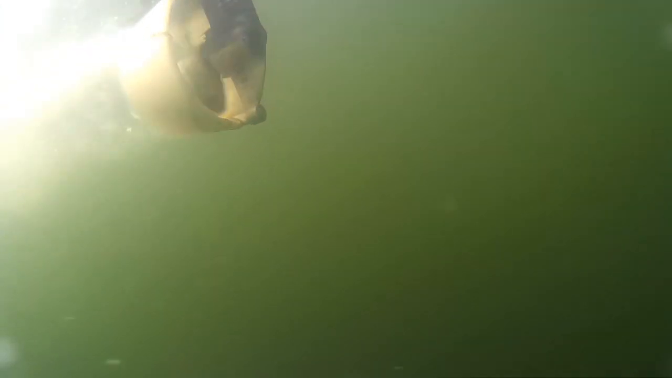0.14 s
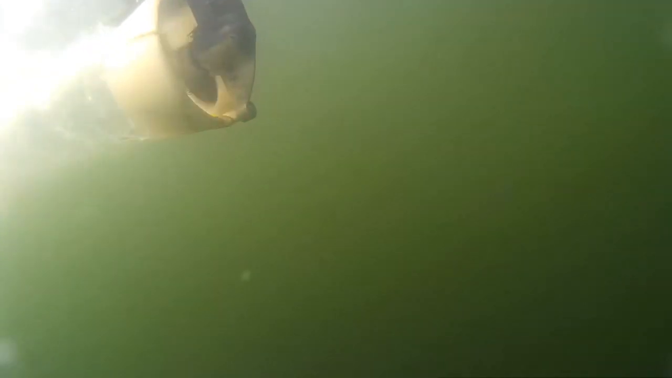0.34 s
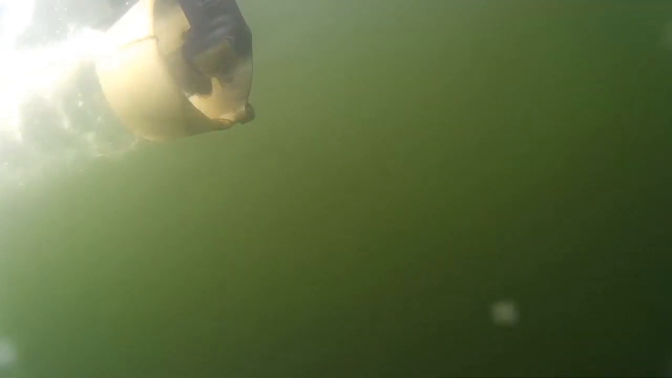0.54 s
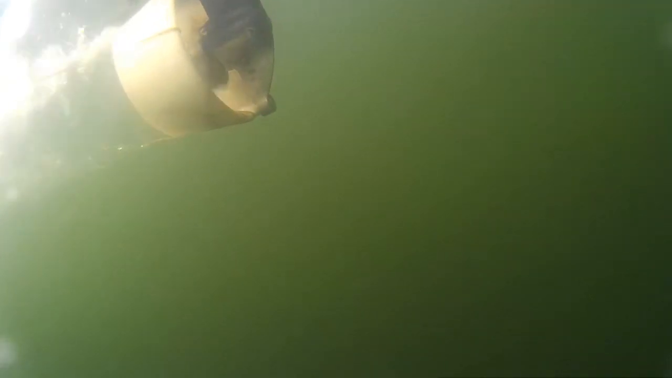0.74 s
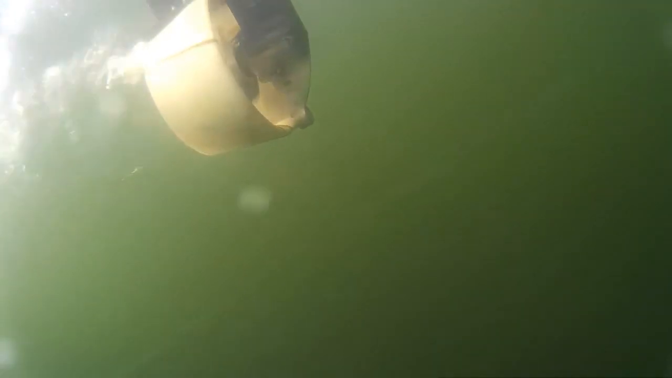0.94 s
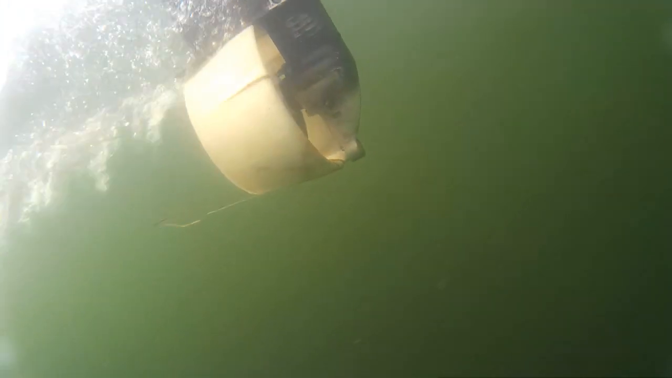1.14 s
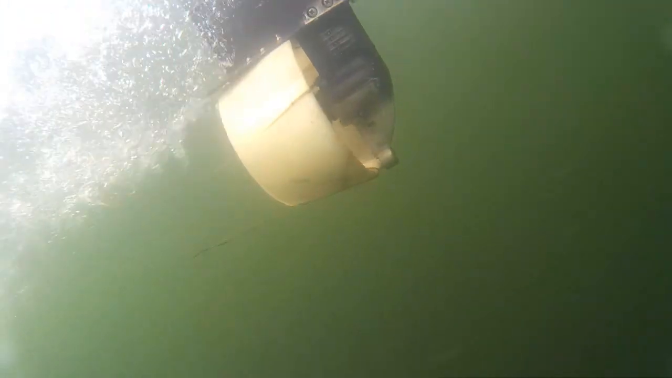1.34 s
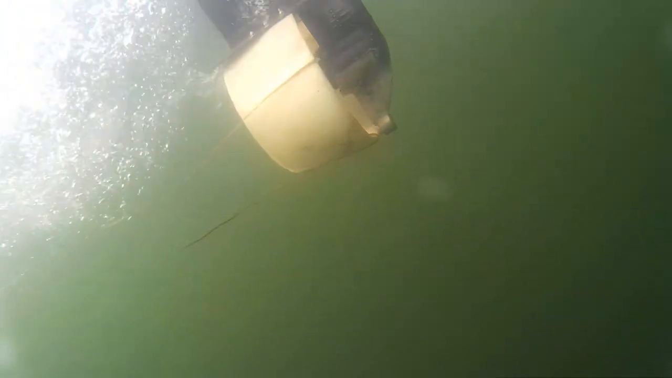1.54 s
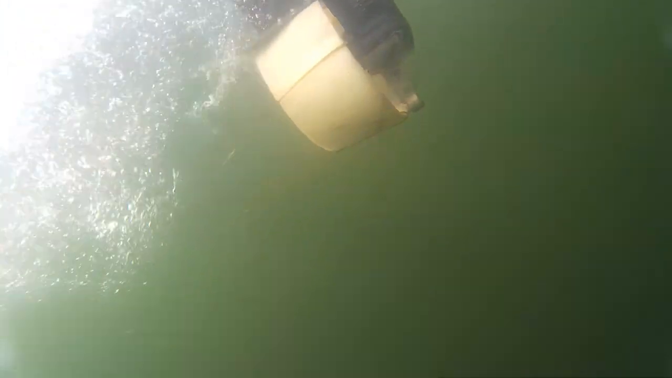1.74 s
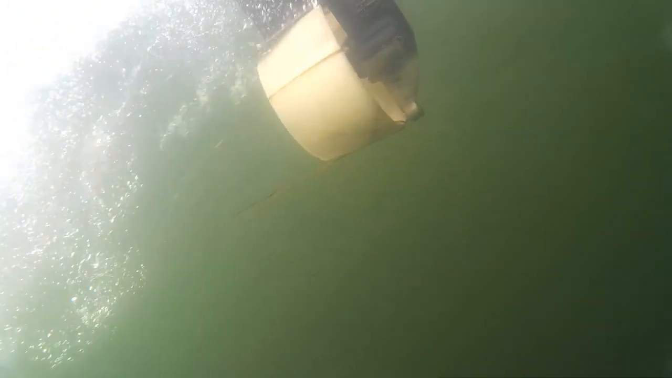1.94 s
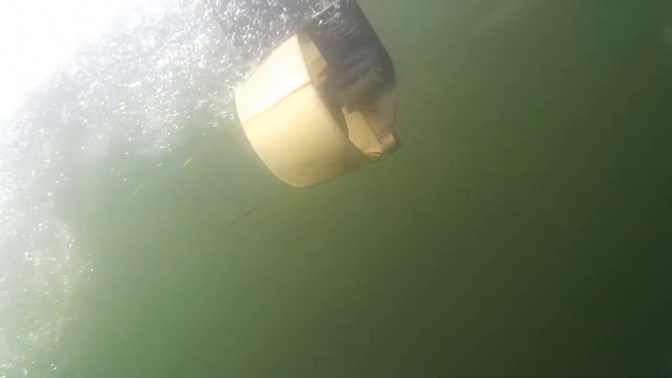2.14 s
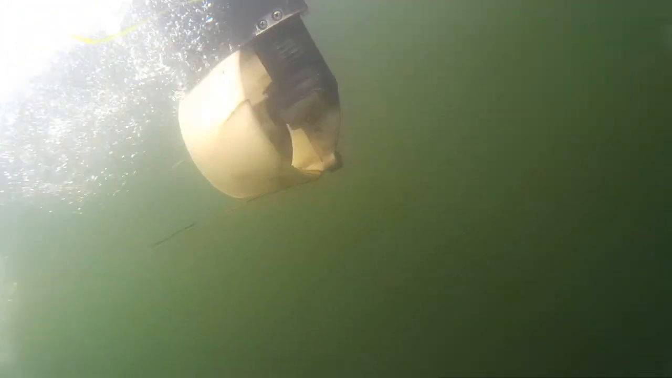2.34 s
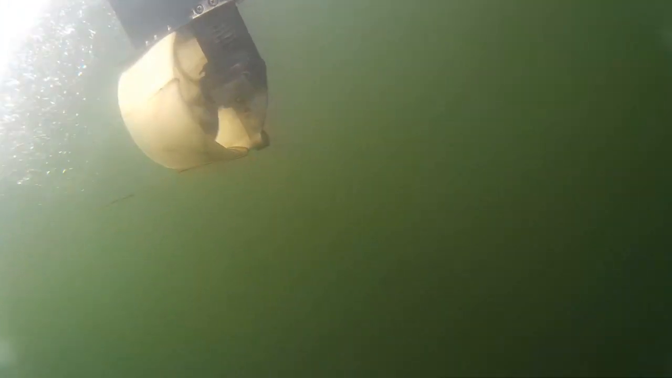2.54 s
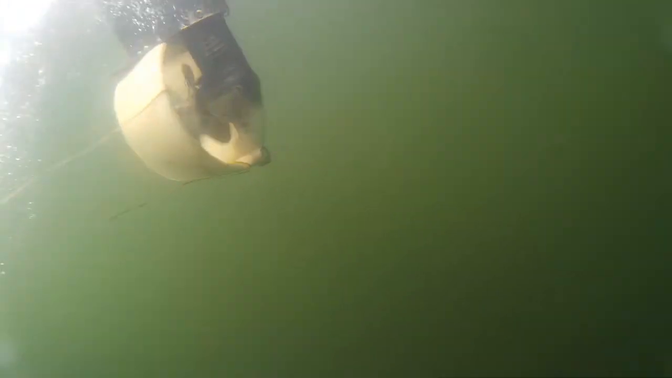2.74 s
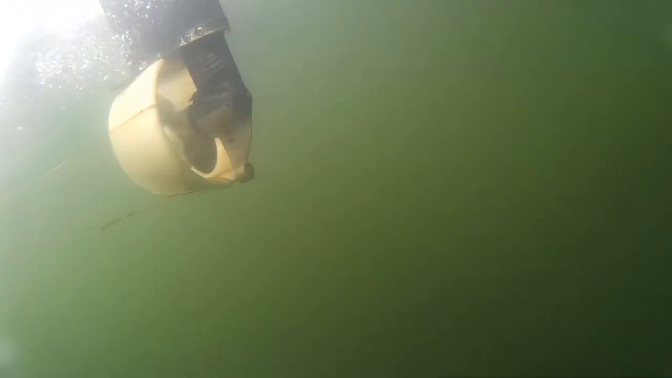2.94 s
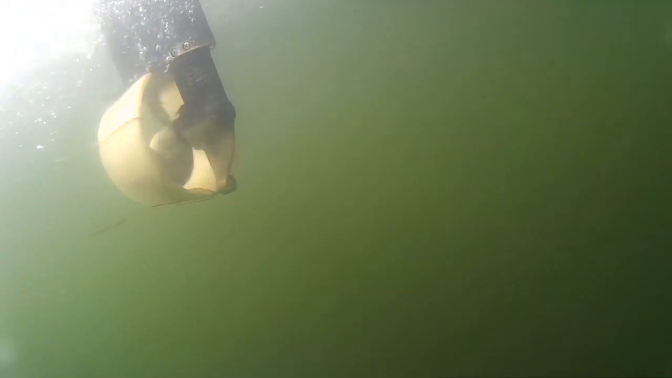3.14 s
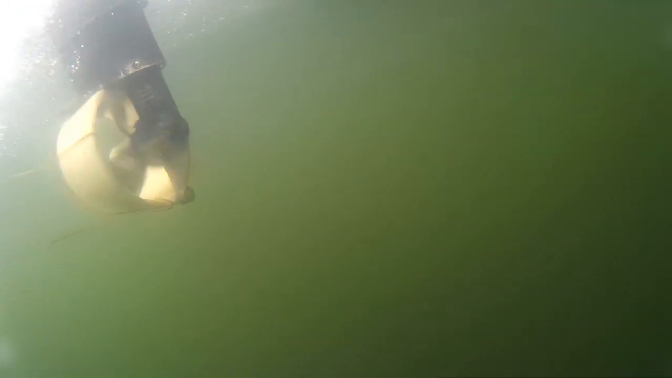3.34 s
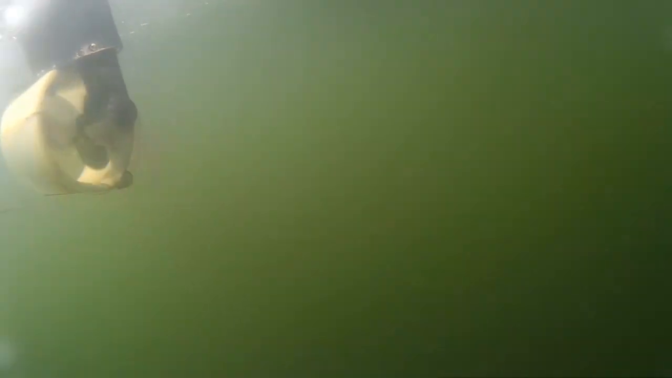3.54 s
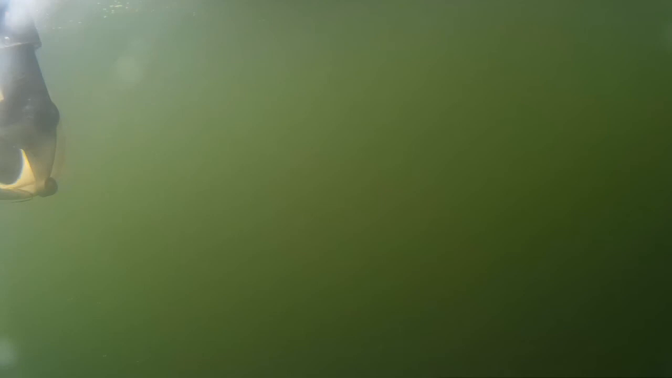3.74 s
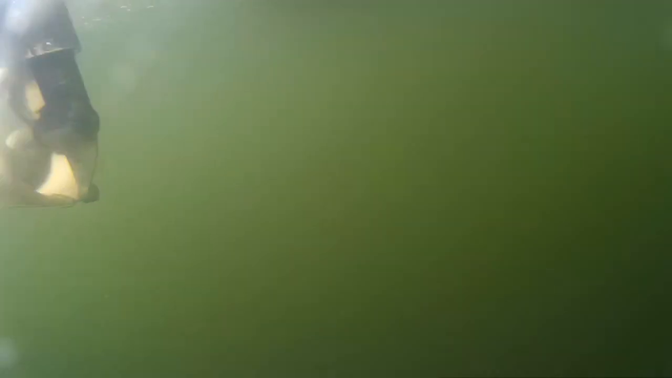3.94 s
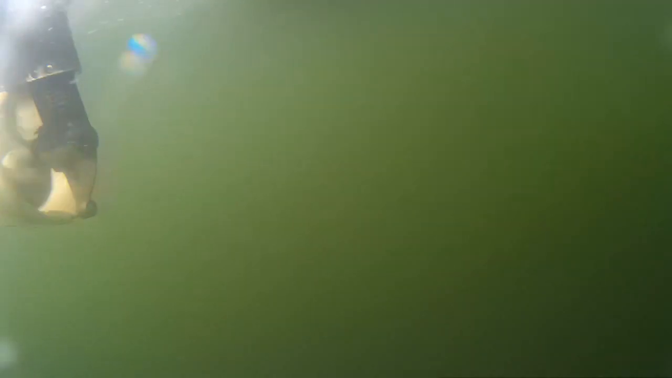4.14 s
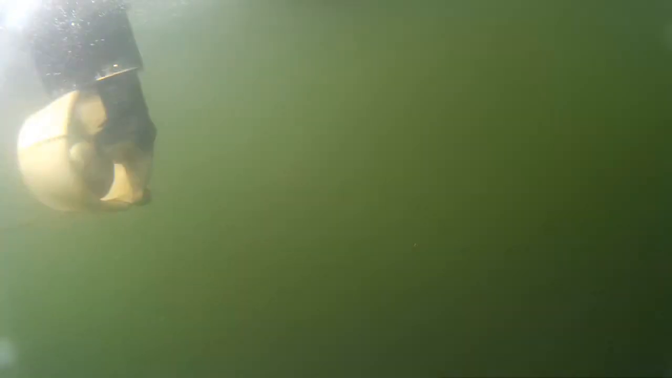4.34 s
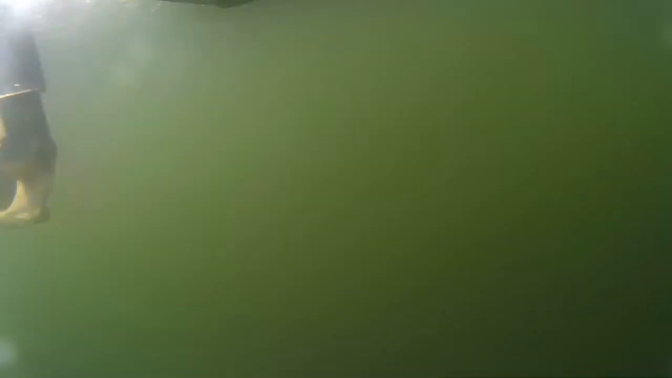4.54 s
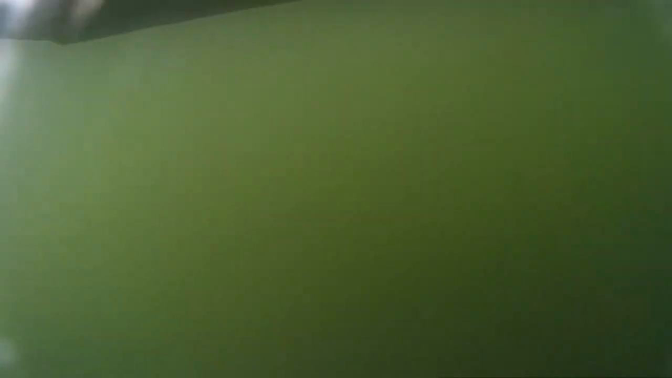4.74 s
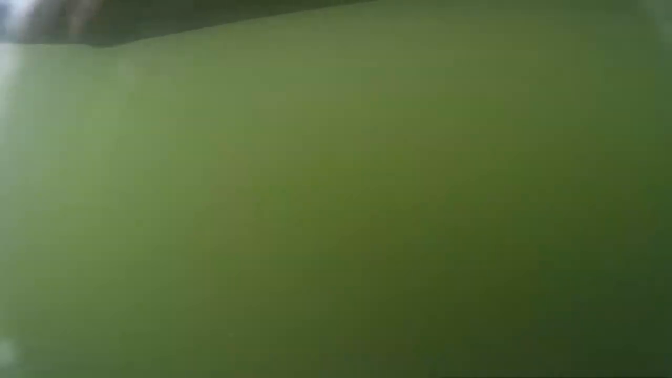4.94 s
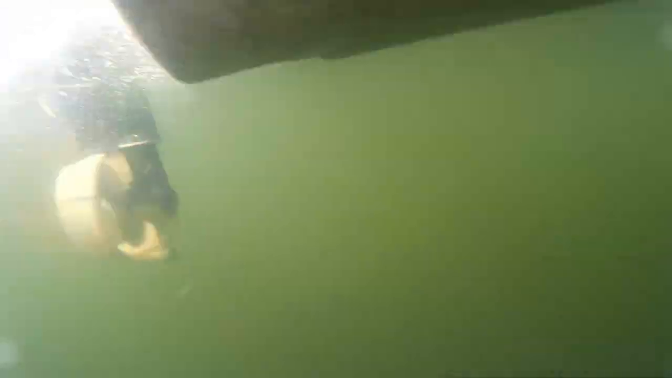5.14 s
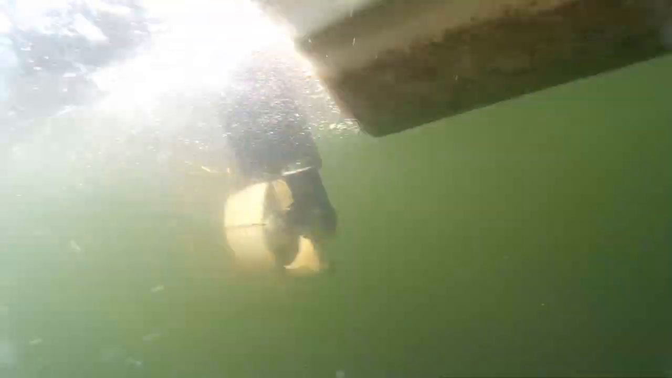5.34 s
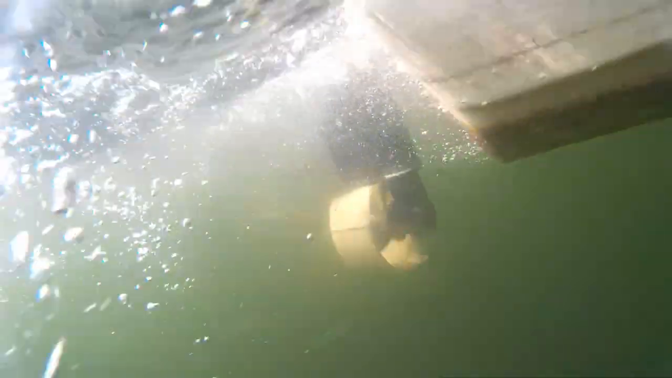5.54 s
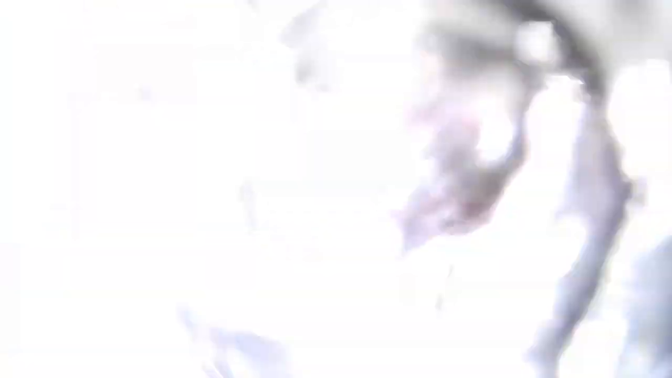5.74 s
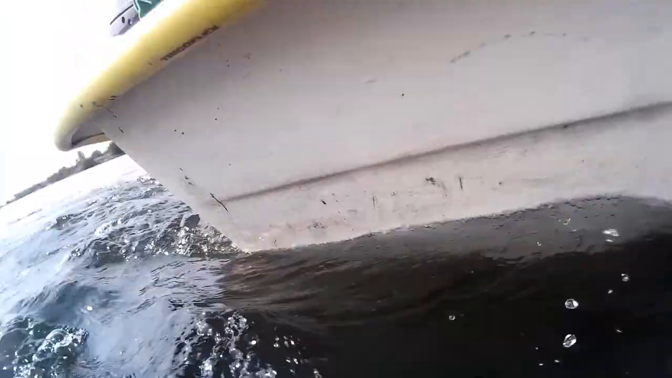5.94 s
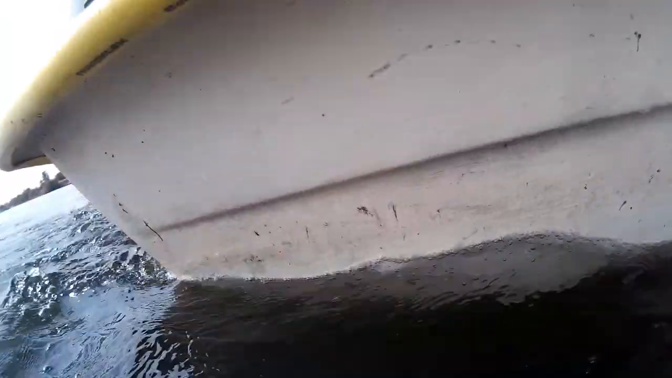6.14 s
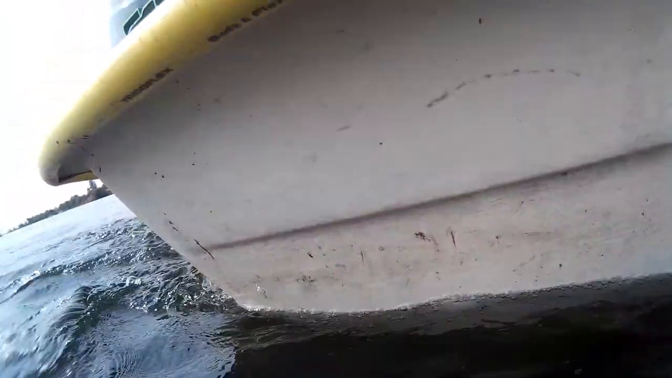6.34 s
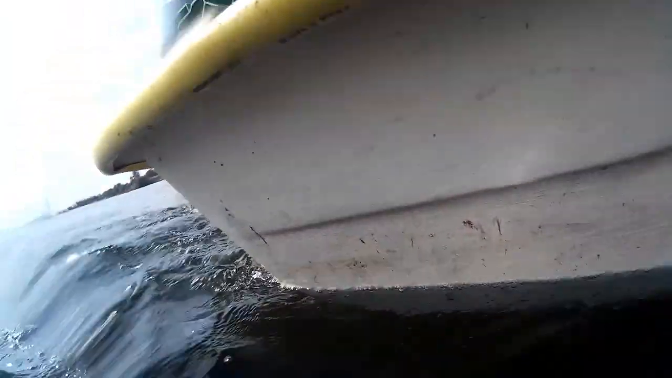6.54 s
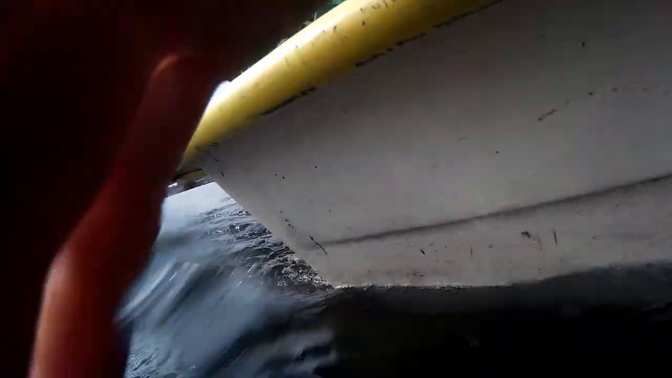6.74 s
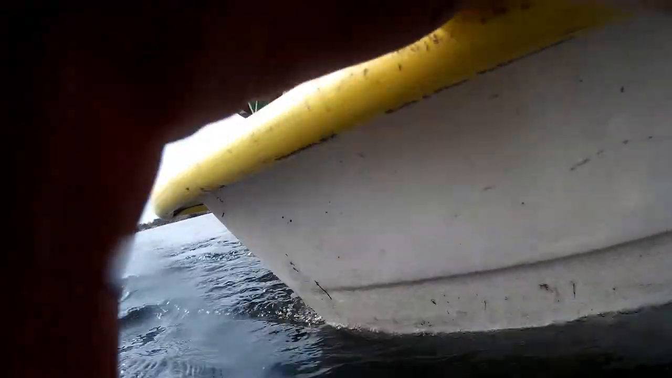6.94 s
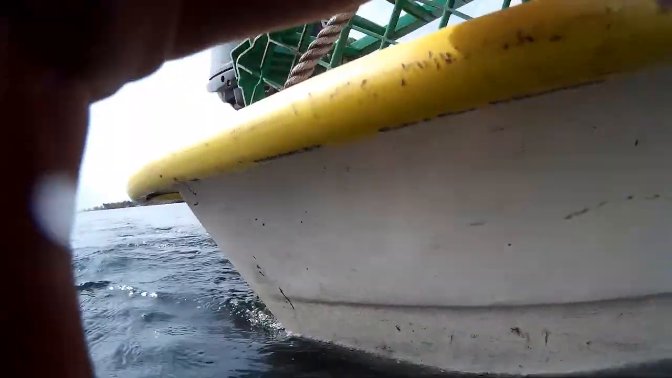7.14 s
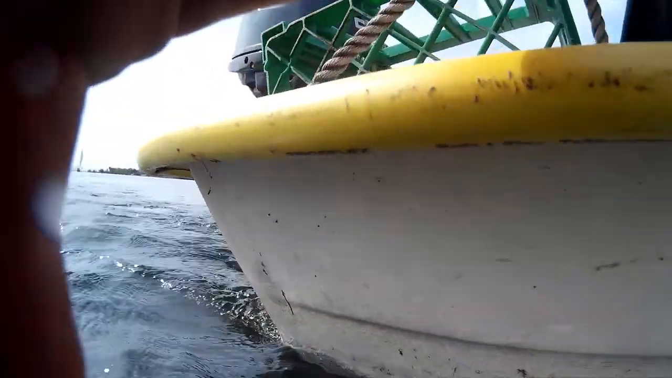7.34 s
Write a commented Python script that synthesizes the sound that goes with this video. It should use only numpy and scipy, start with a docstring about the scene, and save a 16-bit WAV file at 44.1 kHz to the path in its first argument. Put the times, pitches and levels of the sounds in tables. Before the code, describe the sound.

A microphone in a sealed housing sits underwater near a small outboard. From 0 to 0.7 seconds the motor runs fast, a dense drone with gear whine and gurgling exhaust. It slows from 0.7 to 2, unloaded gears singing as pitch falls, into a quick metallic ticking idle, about twelve cycles a second, over a hollow 600 hertz hum. Low bubble thumps with clicks strike at 1.7, 2.7 and 4.2, briefly ducking everything; glugs, plops and foam fizz scatter between. Idle quickens slightly after 4.4. From 5.6 to 6.05 the housing surfaces: bright rising plops, chirping drips, washing water and a click. The motor drops to a faint airborne whirr with hiss, water washing until 6.2. Quiet follows, with a small tap at 6.7, spray swish and wet finger squeak at 6.85, a very loud hard knock at 6.98, a soft press at 7.1, a sharp crack at 7.18 and light washing to the end.

```python
"""Outboard heard under water

A small four-stroke outboard is throttled back to idle: ticking valves, whining gears and a humming leg.
These are cycle-locked pulses and sines, filtered noise and resonances; exhaust is swarms of decaying sines.
Big bubbles thump the camera housing with low rings and overload clicks, and the level ducks under them.
The housing then surfaces through splashing water: chirps, shaped noise and knocks of noise plus shell modes."""
import sys
import numpy as np
from scipy import signal
from scipy.fft import rfft, irfft, next_fast_len
from scipy.io import wavfile
from scipy.ndimage import uniform_filter1d, map_coordinates

SR = 44100
rng = np.random.default_rng(int(sys.argv[2]) if len(sys.argv) > 2 else 0)


def generate_wav(sig):
    """Save sig (samples, or channels by samples) to the path in sys.argv[1] as 16-bit PCM at SR."""
    pcm = np.round(np.clip(np.atleast_2d(sig).T, -1, 1) * 32767).astype(np.int16)
    wavfile.write(sys.argv[1], SR, pcm)


N = 325458
T = np.arange(N) / SR


def motor(submerged, surge, foam_clouds):
    """Metal, lines, tooth noise and exhaust share one engine cycle; all fade as the housing surfaces."""
    cycle = engine_cycle()
    throttle = opening()
    turn = 2 * np.pi * (cycle + CRANK_JITTER_CYCLES * wobble(90))
    machinery = metal(cycle, throttle) + lines(turn, throttle) + mesh(turn, throttle)
    return submerged * (machinery + exhaust(cycle, throttle, submerged, surge, foam_clouds))


# engine speed: t/s, cycle rate/Hz
ENGINE_SPEED = [(0, 28.3), (.5, 28), (.72, 26.6), (.85, 23.9), (1, 22), (1.3, 17), (1.55, 14.8), (2, 12.3),
                (2.6, 11.6), (3.95, 11.63), (4.1, 12), (4.4, 12.3), (4.8, 13.2), (5.1, 13.1), (5.4, 14)]


def engine_speed():
    """Four-stroke cycles per second; each cycle is two crank turns."""
    return curves(ENGINE_SPEED)[0]


VALVE_S = 3.108  # cycle count is zero here, as a valve shuts
CRANK_JITTER_CYCLES = .001  # uneven rotation


def engine_cycle():
    """Integrated speed gives the running cycle count."""
    cycle = np.cumsum(engine_speed()) / SR
    return cycle - np.interp(VALVE_S, T, cycle)


def opening():
    """Throttle from speed: 0 at the slowest, 1 at the fastest."""
    speed = engine_speed()
    return (speed - speed.min()) / np.ptp(speed)


def stroke(cycle, offset, length):
    """A sharp rise and exponential fall once a cycle."""
    return np.exp(-((cycle - offset) % 1) / length)


# machinery reference level: t/s, level/dB
MACHINE_LEVEL = [(0, -48.5), (.9, -46.5), (1.7, -50), (1.85, -51.5), (2.4, -59.5), (2.65, -49.5),
                 (4.15, -50.5), (4.3, -59.5), (4.9, -50.5), (5.5, -53.5), (5.7, -63.5)]
# casing spectrum: f/Hz, density/dB per Hz
CASING_SPECTRUM = [(500, -23.5), (1000, -2), (1250, -5.5), (1430, 6.5), (1800, 10.5), (2200, -8),
                   (2600, -10), (3080, 7.5), (3400, -1.5), (3800, -15), (5000, -34.5), (10000, -48.5),
                   (15000, -54)]
# valve tick spectrum: f/Hz, density/dB per Hz
TICK_SPECTRUM = [(400, -4), (1500, 20.5), (3200, 3), (4000, -3.5), (5600, -21.5), (6500, -14.5),
                 (8000, -30), (15000, -33)]
# motor leg resonances: f/Hz, width/Hz, level/dB
LEG_MODES = [(1425, 34, 13.5), (3130, 840, -33.5), (5500, 160, -9), (6150, 160, -31.5), (7850, 290, -15),
             (9220, 100, -16.5)]
LEG_WANDER = .02  # share by which passing bubbles detune the leg


def metal(cycle, throttle):
    """Valve impacts and rubbing drive casing and leg; ticks are distinct at idle, blurred at speed."""
    machine_db, = curves(MACHINE_LEVEL)
    valves = stroke(cycle, -.025, .09) + .55 * stroke(cycle, .475, .08)
    valves = valves * (1 - .8 * throttle) * amp(2 * wobble(20))
    steady = .55 + .45 * throttle
    rub = noise() * (steady + 2.2 * valves) * amp(2 * wobble(60))
    casing = coloured(rub, CASING_SPECTRUM)
    tapping = noise() * (steady + 4.5 * valves)
    ringing = waver(resonate(tapping, LEG_MODES), LEG_WANDER, rate=20)
    leg = coloured(ringing, [(900, -19.0), (1400, 8.5), (3200, -0.5), (4000, -13.0), (5400, -5.0),
                             (9600, -8.5), (12000, -22.5)])
    ticks = amp(-2.5) * coloured(noise() * valves, TICK_SPECTRUM)
    body = amp(9.5 - 5.8 * throttle) * casing + amp(8.0 + 0.67 * throttle) * leg
    return amp(machine_db) * (body + ticks)


# gear lines: multiple of cycle rate, level/dB
GEAR_LINES = [(26, -3), (48, -10), (52, 0), (58, -10), (63, -7), (76, -3), (80, -9), (90, -11), (100, -10),
              (104, -7), (126, -2), (148, -8)]
# gear case response to the whine: f/Hz, gain/dB
GEARCASE_RESPONSE = [(550, 0), (730, 1), (1100, -10), (1300, -5), (1450, 0), (1800, -2), (2200, -12),
                     (2600, -13), (2950, -8), (3200, -3), (3350, -4), (3560, -35)]
# firing lines: multiple of cycle rate, level/dB
FIRING_LINES = [(1, -13), (2, -6.5), (3, -10.5), (4, -10.5), (5, -3.5), (6, -6), (9, -14.5), (12, -15),
                (14, -13.5), (17, -10.5), (20, -7.5), (21, -8), (22, -8.5), (26, -7)]
WHINE_DB, DRONE_DB = -38.5, -23  # gains at full throttle
WHINE_FLUTTER_DB, WHINE_BLUR_RAD = 4.2, .45  # scale of each line's random level and phase


def lines(turn, throttle):
    """Gear and firing harmonics are sines locked to the cycle; they stand out under throttle."""
    whine, drone = np.zeros(N), np.zeros(N)
    for k, db in GEAR_LINES:
        level = amp(db + WHINE_FLUTTER_DB * wobble(45))
        whine += level * np.sin(k * turn + WHINE_BLUR_RAD * wobble(140))
    whine = shaped(whine, GEARCASE_RESPONSE)
    for k, db in FIRING_LINES:
        drone += amp(db + 2 * wobble(8)) * np.sin(k * turn + rng.uniform(0, 2 * np.pi))
    return amp(WHINE_DB) * throttle ** 0.5 * whine + amp(DRONE_DB) * throttle ** 3 * drone


MESH_DB, MESH_CLOSING_DB = -51.5, 8  # at full throttle; added as the throttle closes
CLOSING_HZ_PER_S = 17  # slowing that gives the whole addition


def mesh(turn, throttle):
    """Tooth noise is a comb under throttle; unloaded teeth sing out as the engine slows."""
    closing = np.clip(-np.gradient(engine_speed()) * SR / CLOSING_HZ_PER_S, 0, 1)
    closing = uniform_filter1d(closing, size=SR // 10)
    level = amp(MESH_DB + MESH_CLOSING_DB * closing + 1.5 * wobble(26))
    return level * throttle ** 3.1 * coloured(teeth(turn / (2 * np.pi), size=256), CASING_SPECTRUM)


def teeth(cycle, size):
    """Uneven teeth: one rough pattern repeats every crank turn, twice a cycle."""
    return np.interp(2 * cycle % 1, np.arange(size) / size, rng.standard_normal(size), period=1)


# exhaust wake reaching the housing: t/s, level/dB
WAKE_LEVEL = [(0.0, -33), (0.81, -36), (1.13, -32), (1.51, -34.5), (2.2, -32), (2.46, -32.5), (3.54, -33),
              (3.73, -36.5), (3.91, -51.5), (4.14, -37.5), (4.3, -29.5), (4.68, -31), (4.86, -42.5),
              (5.27, -29.5), (5.46, -48), (5.7, -43.5)]
# leg hum resonances: f/Hz, width/Hz, level/dB
HUM_MODES = [(600, 63.4, 20.5), (663, 240, -27.5)]
# foam spectrum: f/Hz, density/dB per Hz
FOAM_SPECTRUM = [(500, -3), (1000, -2), (1500, -2), (2100, 0), (2500, -7), (3300, -2), (4500, -11.5),
                 (9000, -12)]
GURGLE_DB, BURBLE_DB = 3.5, 2  # re wake level
HUM_DB, HUM_FOLLOWS = -25, 0.33  # level at mean wake; dB per dB of wake
HUM_WANDER = .03  # share by which passing bubbles detune the hum
FOAM_DB, FOAM_THROTTLE_DB = -38.5, -11.5  # at idle; change at full throttle
FOAM_SWELL_DB, FOAM_SWELL_KNOTS_PER_S = 2, 13
SURGE_GURGLE_DB, SHIELD_DB = -26.5, -23  # surge to gurgle; surge to screening of hum and foam


def exhaust(cycle, throttle, submerged, surge, foam_clouds):
    """Puffs ring the leg and tear into bubble swarms; air pockets screen hum and foam."""
    wake_db, = curves(WAKE_LEVEL)
    puffs = (1 + 1.2 * stroke(cycle, 0.15, 0.15)) * amp(2.6 * wobble(45))
    ringing = waver(resonate(noise() * puffs, HUM_MODES), HUM_WANDER, rate=20)
    hum = coloured(ringing, [(200, -8.0), (480, 3.5), (760, 4), (950, -7.5), (2000, -35.0)])
    burble = coloured(swarm(70, 520, .6, 34, 2.2, size=3400), [(800, 0), (1100, -7)])
    gurgle = swarm(170, 260.4, 1.0, 3.2, 2.5, size=3400)
    foam_swell = amp(FOAM_SWELL_DB * wobble(FOAM_SWELL_KNOTS_PER_S))
    foam = coloured(swarm(1100, 1500, .65, 16, 1.6, size=520) * foam_swell, FOAM_SPECTRUM)
    hum_gain = amp(HUM_DB + HUM_FOLLOWS * (wake_db - wake_db.mean())) * submerged ** 2
    gurgle_gain = np.hypot(amp(wake_db + GURGLE_DB), amp(SURGE_GURGLE_DB) * surge) * submerged ** 4
    burble_gain = amp(wake_db + BURBLE_DB) * submerged ** 4
    foam_gain = np.hypot(amp(FOAM_DB + FOAM_THROTTLE_DB * throttle), foam_clouds)
    screened = 1 / (1 + amp(SHIELD_DB) * surge)
    return screened * (hum_gain * hum + foam_gain * foam) + gurgle_gain * gurgle + burble_gain * burble


# foam and fizz clouds: t/s, foam level/dB, fizz level/dB
BUBBLE_CLOUDS = [(1.23, -32.5, -74), (1.65, -44, -67), (2.25, -27, -70), (2.654, -22, -54.5),
                 (3.17, -28.5, -81), (3.581, -35.5, -79), (4.14, -52, -64), (5.68, -23.5, -63)]
CLOUD_RISE_S, CLOUD_FALL_S = 0.019, 0.0052


def drifting():
    """Foam and fizz gains swell as clouds of fine bubbles drift past."""
    return sum(amp([[foam_db], [fizz_db]]) * swell(s, CLOUD_RISE_S, CLOUD_FALL_S)
               for s, foam_db, fizz_db in BUBBLE_CLOUDS)


# large air pockets at the housing: t/s, peak/dB, f/Hz, t60/s
AIR_POCKETS = [(1.714, 1.5, 169, 0.065), (1.743, 18, 91.1, 0.24), (2.309, -1.5, 144.6, 0.037),
               (2.708, -1, 147, 0.082), (2.749, 8, 85, 0.038), (3.471, -5.5, 132.6, 0.1),
               (3.589, -7, 93.4, 0.065), (3.641, -12, 148, 0.079), (3.655, 0.5, 131, 0.091),
               (4.178, 8, 121, 0.046), (4.202, 17, 128.4, 0.039), (4.211, 3.5, 48.6, 0.23),
               (4.25, -0.5, 127, 0.032), (4.743, -10.5, 141.5, 0.11), (5.543, -20.5, 111, 0.11),
               (5.606, -20, 190, 0.12), (5.826, -19, 165, 0.098)]
SURGE_RISE_S, SURGE_FALL_S = 0.013, 0.086


def stirring():
    """Water surge round the air pockets: a gain summed in power."""
    return np.sqrt(sum((amp(db) * swell(s, SURGE_RISE_S, SURGE_FALL_S)) ** 2
                       for s, db, hz, t60 in AIR_POCKETS))


# exhaust bubbles: t/s, peak/dB, f/Hz, t60/s
EXHAUST_BUBBLES = [(.074, -13.5, 590, 0.039), (.832, -11, 587, 0.032), (.975, -11.5, 569, 0.048),
                   (.9995, -3, 590, 0.02), (1.085, -9.5, 566, 0.052), (1.236, -12, 596, 0.083),
                   (1.247, -9.5, 450, 0.063), (1.259, -20.5, 585, .06), (1.304, -7, 513, 0.079),
                   (1.319, -11, 568, 0.061), (1.339, -9.5, 580, 0.051), (1.375, -16.5, 457, 0.18),
                   (1.834, -1.5, 620, 0.075), (1.853, 3.5, 478, 0.077), (1.857, -4, 722, 0.08),
                   (1.99, -5.5, 514, 0.039), (2.034, 0, 558, 0.033), (2.038, -8.5, 362, 0.13),
                   (2.117, -7, 406, 0.053), (2.288, 2, 577, 0.04), (2.421, -8, 565, 0.12),
                   (2.478, -11, 593, 0.06), (2.674, -6.5, 540, 0.031), (2.936, -12, 643, 0.054),
                   (2.971, -12, 605, .05), (3.125, -5.5, 592, 0.018), (3.254, -7, 637, 0.02),
                   (3.285, -11, 605, 0.054), (3.311, -7, 583, 0.028), (3.508, -11, 585, 0.081),
                   (3.72, -12, 611, 0.059), (4.153, -8, 623.5, 0.45), (4.405, -4, 315.5, 0.12),
                   (4.542, -9.5, 683, 0.053), (4.594, -2.5, 555, 0.044), (4.8, -12, 745, 0.073),
                   (4.872, -10.5, 665, 0.016), (5.083, -13.5, 606, 0.088), (5.119, -2, 606, 0.045),
                   (5.167, -10, 515, 0.043), (5.195, -10, 560, 0.044), (5.239, -8.5, 596, 0.049),
                   (5.285, -12.5, 610, 0.062), (5.345, -19.5, 646, 0.12), (5.359, -6, 638, 0.06),
                   (5.48, -15, 616, 0.099)]
# bright plops, under water and at the surface: t/s, peak/dB, f/Hz, t60/s, pitch rise/share
PLOPS = [(.832, -27, 810, 0.033, 0.016), (1.423, -25, 1480, 0.04, .1), (2.035, -20.5, 716, 0.038, 0.015),
         (2.125, -21, 1447, 0.053, 0.22), (2.632, -12, 1414, 0.024, 0.38),
         (3.253, -20.5, 1390, 0.05, 0.025), (4.398, -10, 1374, 0.053, 0.035),
         (4.587, -15.5, 1423, 0.034, 0.089), (5.113, -23.5, 2080, 0.021, 0.035),
         (5.166, -11, 835, 0.049, 0.046), (5.243, -13, 1433, 0.013, 0.047), (5.54, -17, 2650, 0.029, 0.05),
         (5.628, -10.5, 1448, 0.061, 0.12), (5.636, -23, 2680, 0.02, 0.15),
         (5.657, -16, 3100, 0.0316, 0.095), (5.666, -12, 1830, 0.041, 0.034),
         (5.722, -23, 1740, 0.058, 0.22), (5.773, -14, 1710, 0.039, 0.22), (5.78, -10, 1750, 0.056, 0.11),
         (5.783, -32.5, 3230, 0.035, 0.088), (5.804, -12.5, 945, 0.037, .2),
         (5.824, -7.5, 712, 0.074, 0.315), (5.864, -21, 1720, 0.034, 0.14),
         (5.894, -27, 2120, 0.0466, 0.26), (5.964, -8.5, 2020, 0.024, 0.34), (6.039, 1, 1358, 0.06, 0.049)]
# small bubbles and drops: t/s, peak/dB, f/Hz
DROPS = [(1.177, -32, 3850), (1.208, -33.5, 3950), (1.87, -31.5, 3970), (2.567, -30.5, 4230),
         (2.603, -42, 4200), (2.612, -29, 3200), (2.622, -35, 4200), (2.634, -33, 4500), (2.663, -33, 3900),
         (2.671, -36, 3900), (2.69, -37.5, 4000), (3.102, -34, 4100), (3.546, -37, 4100),
         (4.333, -41, 4200), (4.62, -39.5, 4130), (5.115, -32.5, 4200), (5.494, -31, 3940),
         (5.542, -34, 5100), (5.66, -42, 5540), (5.663, -38, 8200), (5.691, -33, 3720), (5.711, -49, 7500),
         (5.761, -52, 8000), (5.8, -37, 5770), (5.855, -48, 7400), (5.862, -26, 3600), (5.914, -35, 3800),
         (5.926, -21.5, 4220), (5.946, -54, 4600), (5.961, -35, 4300), (5.986, -34, 3700)]
PING_T60_S = 0.013


def loud_bubbles():
    """Air volumes ring as decaying sines, from pockets to droplets; some pinch off with a rush."""
    thumps = bubbles(AIR_POCKETS, rise=0.1, onset=0.13, ragged=0.5, ragged_hz=289.7)
    glugs = bubbles(EXHAUST_BUBBLES, rise=0.043, onset=0.95, ragged=0.48, ragged_hz=360)
    glugs += amp(-13.0) * pinches(EXHAUST_BUBBLES, decay_s=0.01)
    plops = amp(-16.5) * pinches([row[:4] for row in PLOPS], decay_s=0.011)
    for *row, rise in PLOPS:
        plops += bubbles([row], rise, onset=0.49, ragged=0.7, ragged_hz=600)
    drops = [(s, db, hz, PING_T60_S) for s, db, hz in DROPS]
    pings = bubbles(drops, rise=0.016, onset=1.3, ragged=0.15, ragged_hz=1200)
    return thumps + glugs + plops + pings + trapped_ring()


# air trapped at the housing: start/s, end/s, f/Hz, level/dB
TRAPPED_AIR = (5.632, 5.646, 590, -7.5)
POCKET_RISE_S, POCKET_FALL_S = 0.0035, 0.018


def trapped_ring():
    """Air trapped against the housing rings about one pitch, with wavering level and phase."""
    start, end, hz, db = TRAPPED_AIR
    level = amp(db + 2.0 * wobble(80)) * swell(start, POCKET_RISE_S, POCKET_FALL_S, end - start)
    return level * np.sin(2 * np.pi * hz * T + 0.42 * wobble(54))


def bubble(t, hz, t60, rise, onset):
    """A bubble swells in, rings down and rises in pitch."""
    age = t / t60
    ring = np.sin(2 * np.pi * hz * t * (1 + rise * np.minimum(age, 1)))
    return ring * np.exp(-float(np.log(1000)) * age) * (1 - np.exp(-np.minimum(t * hz / onset, 20)))


def bubbles(rows, rise, onset, ragged, ragged_hz):
    """Single bubbles; a torn bubble's ringing roughens as its wall flutters."""
    out, t = np.zeros(N), np.arange(SR // 4) / SR
    for s, db, hz, t60 in rows:
        flutter = map_coordinates(rng.standard_normal(1024), [t * ragged_hz], mode="wrap")
        ring = bubble(t, hz, t60, rise, onset) * (1 + ragged * flutter)
        add(out, s, amp(db) * ring / np.abs(ring).max())
    return out


def pinches(rows, decay_s):
    """The short rush of water as each bubble pinches off: pitch-scaled noise."""
    out, t = np.zeros(N), np.arange(SR // 20) / SR
    for s, db, hz, t60 in rows:
        spectrum = [(hz / 5, -14), (0.44 * hz, 0), (1.0 * hz, 0), (2.07 * hz, -20), (6 * hz, -47),
                    (12 * hz, -68)]
        rush = coloured(rng.standard_normal(len(t)), spectrum)
        add(out, s, amp(db) * rush * np.exp(-t / decay_s) * (1 - np.exp(-t * hz * 2)))
    return out


def swarm(rate, centre_hz, spread, cycles, scatter_db, size, rise=0.049):
    """A random bubble cloud at rms 1: rate per second, t60 in cycles, size in samples."""
    count = int(rate * N / SR)
    u = rng.random((count, 4), dtype=np.float32)
    t = np.arange(size, dtype=np.float32) / SR
    hz = np.minimum(centre_hz * np.exp(spread * (u[:, 1:2] + u[:, 2:3] - 1)), SR / 3)
    level = amp(-scatter_db * np.log(0.0017 + u[:, 3:]))
    grains = level * bubble(t, hz, cycles / hz, rise, onset=0.48)
    at = (u[:, :1] * N).astype(int) + np.arange(size)
    return unit(np.bincount(at.ravel(), grains.ravel(), N)[:N])


# overload clicks at the bubble thumps, then blows to the housing: t/s, level/dB, ring re click/dB
CLICKS_AND_KNOCKS = [(1.178, -20.5, -29), (1.209, -17, -23), (1.719, -27, -20.5), (1.743, -15, -21),
                     (2.708, -23.5, -30), (3.644, -26, -23), (4.183, -12.5, -44), (4.204, -9.5, -17),
                     (5.121, -18.5, -10), (6.037, -10.5, -6), (6.044, -15.5, -4.5), (6.245, -33, -22),
                     (6.726, -34.5, -6), (6.977, 7.5, -10.5), (6.98, 4, -0.5), (6.984, -0.5, 9),
                     (7.061, -15.5, -36), (7.175, 0.5, -41), (7.315, -22.5, -21)]
# crack spectrum: f/Hz, density/dB per Hz
CRACK_SPECTRUM = [(200, -5.5), (800, -4.5), (1400, 3), (2700, -1.5), (5200, -21.5), (8000, -28.5),
                  (12500, -35.5), (15500, -45.5)]
# shell modes: f/Hz, level/dB, t60/s
SHELL_MODES = [(183, -2.5, 0.097), (270, -1.5, 0.0081), (467, 1, 0.011), (850, -1, 0.025), (1310, 0, 0.03),
               (2700, -13.5, 0.01)]
# soft finger press: t/s, level/dB
FINGER_PRESS = (7.1015, -1)


def clicks_and_knocks():
    """Clicks and knocks: a short noise crack plus decaying shell modes; a finger gives one low push."""
    out, t = np.zeros(N), np.arange(SR // 6) / SR
    ring = sum(amp(level - 60 * t / t60) * np.sin(2 * np.pi * hz * t) for hz, level, t60 in SHELL_MODES)
    for s, db, ring_db in CLICKS_AND_KNOCKS:
        crack = coloured(rng.standard_normal(len(t)), CRACK_SPECTRUM) * np.exp(-t / 0.0033)
        add(out, s, amp(db) * (0.5 * crack + amp(ring_db) * ring))
    s, db = FINGER_PRESS
    u = t / 0.00096
    add(out, s, amp(db) * (u / 2) ** 2 * np.exp(2 - u) * (1 - u / 14))
    return out


# water washing over the housing, just before and after it surfaces: start/s, end/s, level/dB
WASHES = [(5.627, 5.674, -34.5), (5.774, 5.943, -35.5), (6.032, 6.181, -30), (6.737, 6.763, -45),
          (6.783, 6.952, -35), (7.013, 7.341, -37.5)]
# wash spectrum: f/Hz, density/dB per Hz
WASH_SPECTRUM = [(150, 9.5), (400, 0.5), (900, -3.5), (1400, 6.5), (2100, 1.5), (2900, -14.5), (4200, -14),
                 (5200, -33.5), (9000, -34.5), (15000, -48.5)]
# motor through the air: f/Hz, density/dB per Hz
AIRBORNE_SPECTRUM = [(100, -5), (300, -3.5), (550, -9.5), (700, -6), (900, -10.5), (1200, -4.5),
                     (1350, 6.5), (1600, -21), (1930, -2), (2200, -25), (3800, -23), (4700, -40),
                     (9000, -37)]
WASH_RISE_S, WASH_FALL_S = 0.0086, 0.019
FIZZ_DB = -67  # tiny bubbles


def surface(submerged, fizz_clouds):
    """Fine swarms fizz; at the surface a noise whirr is the motor, noise washes and chirps drain."""
    washing = sum(amp(db) * swell(start, WASH_RISE_S, WASH_FALL_S, end - start)
                  for start, end, db in WASHES)
    near_surface = np.interp(T, [5.55, 5.7], [0, 1])
    whirr = amp(-57.5) * coloured(noise(), AIRBORNE_SPECTRUM)
    wash = coloured(noise() * amp(2.14 * wobble(150)), WASH_SPECTRUM)
    draining = np.interp(T, [5.58, 5.66, 5.98, 6.06, 6.2, 6.25], [0, 1, 1, .5, .5, 0])
    trickle = amp(0.5) * draining * swarm(450, 1800, .8, 30, 2.3, size=1000, rise=.16)
    fine = swarm(800, 4300, .35, 30, 3.9, size=400)
    finest = swarm(900, 7200, .45, 32, 4, size=250)
    fizz_gain = amp(FIZZ_DB) * submerged + fizz_clouds + amp(-68) * draining
    fizz = fizz_gain * (fine + amp(-9.0) * finest)
    return near_surface * (whirr + washing * (wash + trickle)) + fizz + spray_swish() + finger_rub()


# spray swish: t/s, decay/s, level/dB
SPRAY_SWISH = (6.85, 0.031, -27.5)
# spray spectrum: f/Hz, density/dB per Hz
SPRAY_SPECTRUM = [(300, 5.5), (1000, 0.5), (2300, 8.5), (3000, -10), (4400, -2), (5500, -29), (8500, -22),
                  (12000, -52), (15500, -31)]


def spray_swish():
    """Spray is fast-flickering noise under a two-sided exponential."""
    s, decay_s, db = SPRAY_SWISH
    spray = coloured(noise() * amp(6.9 * wobble(560)), SPRAY_SPECTRUM)
    return amp(db) * np.exp(-np.abs(T - s) / decay_s) * spray


# wet finger slip: t/s, half length/s, level/dB
FINGER_RUB = (6.851, 0.012, -15.5)
# shell modes the slip rings: f/Hz, width/Hz, level/dB
FINGER_RUB_MODES = [(464, 150, -4.5), (1120, 150, 4), (1940, 170, 5), (2410, 230, -1.5)]


def finger_rub():
    """A wet finger slips on the shell: rough noise passed twice through its modes."""
    s, half_s, db = FINGER_RUB
    once = resonate(noise() * amp(2.1 * wobble(600)), FINGER_RUB_MODES)
    return amp(db) * np.exp(-((T - s) / half_s) ** 2) * resonate(once, FINGER_RUB_MODES)


# flow rumble spectrum: f/Hz, density/dB per Hz
RUMBLE_SPECTRUM = [(12, -25.5), (25, -0.5), (40, 5), (75, -12), (130, -15.5), (400, -59), (1000, -90.5)]
FLOW_DB, FLOW_THROTTLE_DB = -35.5, -0.5  # at idle; change at full throttle
FLOW_AIR_DB, FLOW_WASH_DB = -47.5, -38
SURGE_RUMBLE_DB = -21  # re surge


def background(submerged, surge):
    """Flow buffets the housing as low noise, more round air pockets and in a wash."""
    washed = np.max([swell(start, WASH_RISE_S, SURGE_FALL_S, end - start) for start, end, db in WASHES],
                    axis=0)
    flow = submerged * amp(FLOW_DB + FLOW_THROTTLE_DB * opening() ** 4)
    flow = flow + amp(FLOW_AIR_DB) * (1 - submerged) + amp(FLOW_WASH_DB) * washed
    return np.hypot(flow, amp(SURGE_RUMBLE_DB) * surge) * coloured(noise(), RUMBLE_SPECTRUM)


def amp(db):
    """Decibels to gain."""
    return 10 ** (np.asarray(db) / 20)


def unit(x):
    """Scale to rms 1."""
    return x / np.sqrt(np.mean(x ** 2) + 1e-20)


def noise():
    """White noise."""
    return rng.standard_normal(N)


def curves(rows):
    """One value per sample for each column after the time."""
    s, *cols = np.transpose(rows)
    return [np.interp(T, s, c) for c in cols]


def wobble(rate):
    """A smooth random curve, rate knots a second."""
    knots = rng.standard_normal(int(N * rate / SR) + 4)
    smooth = signal.resample(knots, 10 * len(knots))
    return np.interp(T * rate * 10, np.arange(len(smooth)), smooth)


def waver(x, share, rate):
    """Random time shifts detune x; share sets their depth, rate their knots a second."""
    return np.interp(T + share * wobble(rate) / (2 * rate), T, x)


def swell(s, rise_s, fall_s, hold_s=0):
    """An envelope that grows up to time s, holds and dies away."""
    before = np.maximum(s - T, 0) / rise_s
    after = np.maximum(T - s - hold_s, 0) / fall_s
    return np.exp(-np.minimum(before + after, 30))


def filtered(x, response):
    """x times a response of frequency."""
    m = next_fast_len(len(x) + 8192)
    return irfft(rfft(x, m) * response(np.fft.rfftfreq(m, 1 / SR)), m)[:len(x)]


def shaped(x, points):
    """x through a (f/Hz, gain/dB) response."""
    f, db = np.transpose(points)
    return filtered(x, lambda hz: amp(np.interp(np.log(hz + 1), np.log(f), db)))


def coloured(x, points):
    """x through a (f/Hz, gain/dB) response, at rms 1."""
    return unit(shaped(x, points))


def resonate(x, modes):
    """x through (f/Hz, width/Hz, level/dB) resonances, at rms 1."""
    def response(f):
        return sum(amp(db) * 1j * f * w / (c * c - f * f + 1j * f * w) for c, w, db in modes)
    return unit(filtered(x, response))


def add(track, s, sound):
    """Mix a sound into the track at time s."""
    part = track[max(round(s * SR), 0):][:len(sound)]
    part += sound[:len(part)]


SURFACING_S = (5.74, 5.85)  # the housing leaves the water


def scene():
    """Everything reaches one microphone inside the housing."""
    submerged = np.interp(T, SURFACING_S, [1, 0])
    surge = stirring()
    foam_clouds, fizz_clouds = drifting()
    mix = motor(submerged, surge, foam_clouds) + loud_bubbles() + clicks_and_knocks()
    return (mix + surface(submerged, fizz_clouds) + background(submerged, surge))[None]


LIMIT_DB, LIMIT_ATTACK_S, LIMIT_RELEASE_S = -5, 0.0032, 0.17


def gain_control(x):
    """A peak over the limit quickly turns the gain down; it creeps back afterwards."""
    over_db = np.maximum(20 * np.log10(np.abs(x) + 1e-9) - LIMIT_DB, 0)
    fade = np.exp(-T / LIMIT_RELEASE_S)
    held_db = np.maximum.accumulate(over_db / fade) * fade
    k = np.exp(-1 / (LIMIT_ATTACK_S * SR))
    return x * amp(-signal.lfilter([1 - k], [1, -k], held_db))


# electronic hiss spectrum: f/Hz, density/dB per Hz
HISS_SPECTRUM = [(100, 2), (3000, 7.5), (5000, -6), (13000, -3), (15500, -13.5)]
HISS_DB, CLIP_LEVEL, TOP_HZ = -67, .7, 15820


def record(dry):
    """A 12 Hz high-pass, ducking, electronic hiss, soft clipping and a band limit."""
    x = gain_control(filtered(dry[0], lambda hz: 1j * hz / (12 + 1j * hz)))
    x = x + amp(HISS_DB) * coloured(noise(), HISS_SPECTRUM)
    clipped = x / (1 + np.abs(x / CLIP_LEVEL) ** 8) ** (1 / 8)
    return filtered(clipped, lambda hz: (hz < TOP_HZ) / np.sqrt(1 + (hz / 15000) ** 8))[None]


dry = scene()
out = record(dry)
generate_wav(out)
```